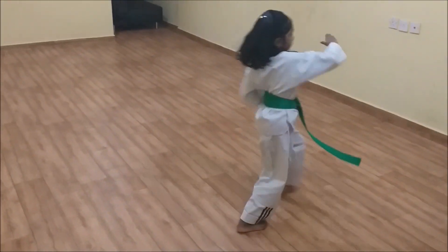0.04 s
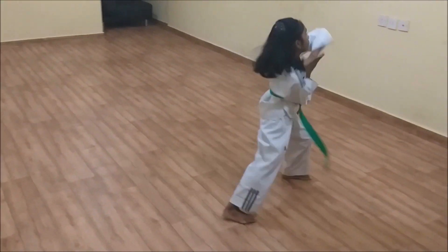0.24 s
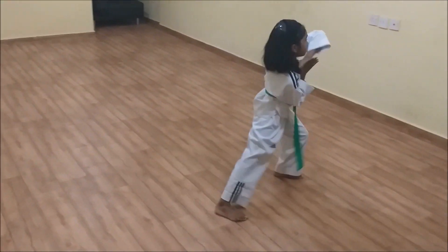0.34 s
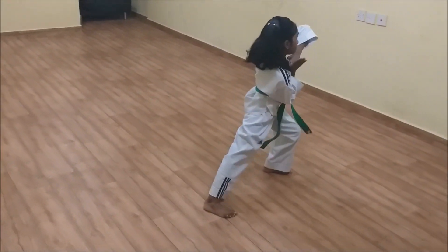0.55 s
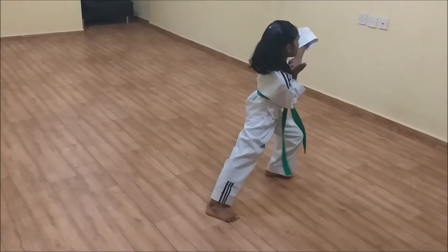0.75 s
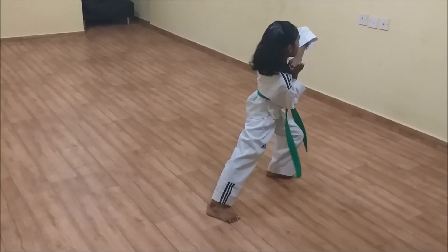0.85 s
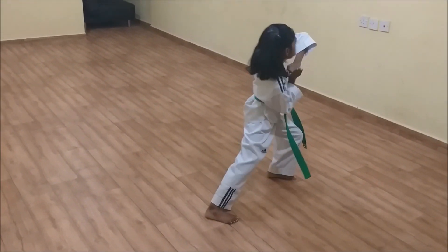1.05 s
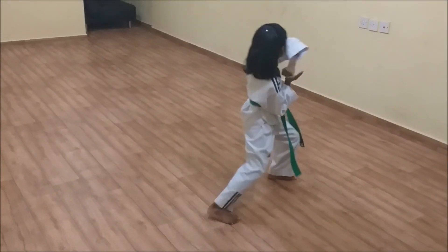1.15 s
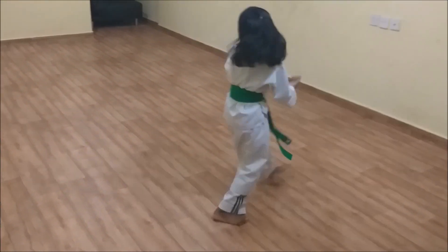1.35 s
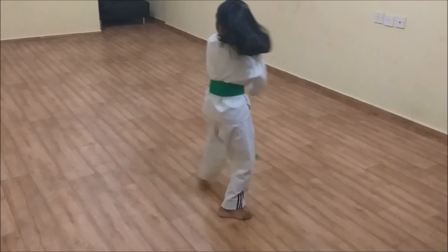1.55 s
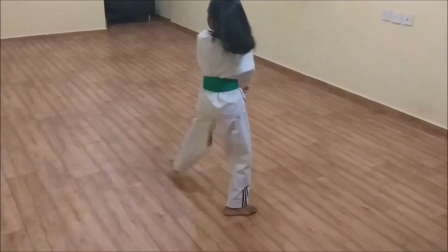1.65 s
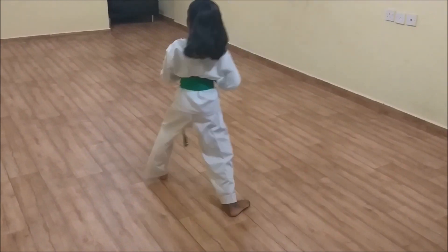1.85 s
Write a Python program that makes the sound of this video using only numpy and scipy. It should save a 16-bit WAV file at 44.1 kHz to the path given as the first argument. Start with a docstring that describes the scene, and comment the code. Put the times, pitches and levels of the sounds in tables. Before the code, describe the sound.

A stiff cotton uniform snaps sharply as a child strikes, ringing briefly around a bare room. After a lull, the cloth swishes through a turn, with faint barefoot scuffs and soft floor thuds over a low room rumble.

```python
"""A sharp cloth snap rings round a bare, hard-walled room: a child practises strikes in a stiff cotton
uniform. Pulled taut, the cloth gives a quick cluster of cracks; the loose sleeve puffs, crackles and flaps.
Runs of tiny slips make the rustle of the turning child and the brush of bare feet, and weight shifts thud
through the floor. Under it lie a low room rumble, a faint whirr and hiss."""
import sys
import numpy as np
from scipy import signal
from scipy.fft import rfft, irfft, next_fast_len
from scipy.io import wavfile

SR = 44100
rng = np.random.default_rng(int(sys.argv[2]) if len(sys.argv) > 2 else 0)


def dump(signal):
    """Clip the signal to [-1, 1] and save it as 16-bit WAV at the path in sys.argv[1]."""
    limited = np.clip(np.atleast_2d(signal).T, -1, 1)
    pcm = np.round(limited * 32767).astype(np.int16)
    wavfile.write(sys.argv[1], SR, pcm)


N = 83790
T = np.arange(N) / SR


def from_db(db):
    """Decibels to gain."""
    return 10 ** (np.asarray(db) / 20)


def rms_one(x):
    """Scale to unit rms."""
    return x / np.sqrt(np.mean(x ** 2) + 1e-20)


def at_hz(points, hz):
    """Read a table on a log-frequency axis."""
    knots_hz, values = np.transpose(points)
    return np.interp(np.log(np.maximum(hz, 1)), np.log(knots_hz), values)


def colour(x, spectrum, tilt_db_per_oct=0):
    """Minimum-phase filter with the given spectrum, tilted between 200 and 7500 Hz."""
    size = 2 * next_fast_len(N)
    hz = np.arange(size // 2 + 1) * SR / size
    octaves = np.log2(np.clip(hz, 200, 7500) / 5000)
    gain = from_db(at_hz(spectrum, hz) + tilt_db_per_oct * octaves)
    cepstrum = irfft(np.log(gain))
    cepstrum[1:size // 2] *= 2  # fold onto positive time: causal
    cepstrum[size // 2 + 1:] = 0
    return irfft(rfft(x, size) * np.exp(rfft(cepstrum)))[:N]


def coloured_noise(spectrum):
    """Unit-rms noise with the given spectral shape."""
    return rms_one(colour(rng.standard_normal(N), spectrum))


def resonance(hz, width_hz):
    """Denominator of a two-pole resonator."""
    radius = np.exp(-np.pi * width_hz / SR)
    return [1, -2 * radius * np.cos(2 * np.pi * hz / SR), radius * radius]


def ringing_noise(hz, width_hz):
    """Unit-rms noise, twice through one resonance, already settled."""
    section = [1, 0, -1] + resonance(hz, width_hz)
    return rms_one(signal.sosfilt([section, section], rng.standard_normal(2 * N))[N:])


def stroke(start_s, swell_s, fade_s):
    """Envelope of one movement: linear swell, exponential fade."""
    swell = np.clip((T - start_s) / swell_s, 0, 1)
    return swell * np.exp(-np.maximum(T - start_s - swell_s, 0) / fade_s)


def friction(strokes, spectrum, slips_per_s=5000, spread_db=4.5):
    """Each stroke is a dense run of tiny slips of uneven size."""
    out = 0
    for start_s, swell_s, fade_s, db, tilt_db_per_oct in strokes:
        sizes = from_db(spread_db * np.minimum(rng.exponential(1, N), 4))
        signs = rng.choice([-1, 1], N)
        slips = sizes * signs * (rng.random(N) < slips_per_s / SR)
        rub = rms_one(colour(slips, spectrum, tilt_db_per_oct))
        out = out + from_db(db) * stroke(start_s, swell_s, fade_s) * rub
    return out


def in_room(x, repeats, tail_db, build_s=0.016, scatter_db=1.5):
    """Direct sound, delayed repeats and the diffuse tail of hard walls, drawn anew for each call."""
    # Reverberation. Each row: frequency in Hz, T60 in seconds.
    room_t60 = [(200, 0.71), (1000, 0.42), (3000, 0.61), (5500, 0.54), (8000, 0.44), (11000, 0.33),
                (16000, .32)]
    noise = rng.standard_normal(N)
    roughness = from_db(scatter_db * np.repeat(rng.standard_normal(N), 40)[:N])
    scatter = rfft(noise * roughness, 2 * N)
    hz = np.arange(N + 1) / 2 * SR / N
    centres_hz = np.geomspace(200, 16000, 14)
    tail = 0
    for centre_hz, weights in zip(centres_hz, np.eye(len(centres_hz))):
        band = irfft(scatter * np.interp(hz, centres_hz, weights))[:N]
        tail = tail + band * np.exp(-np.log(1000) * T / at_hz(room_t60, centre_hz))
    tail = tail * (1 - np.exp(-T / build_s))
    response = from_db(tail_db) * tail / np.sqrt(np.sum(tail ** 2))
    response[0] += 1
    for delay_s, db in repeats:
        response[int(delay_s * SR)] += from_db(db)
    return signal.fftconvolve(x, response / np.sqrt(np.sum(response ** 2)))[:N]


def microphone_hiss():
    """Independent self-noise in each channel."""
    # Hiss spectrum. Each row: frequency in Hz, relative density in dB.
    hiss_spectrum = [(100, -24), (260, -6), (500, -7), (900, -5.5), (3000, -9), (6000, -7.5), (10000, -3.5),
                     (16000, -12)]
    return from_db(-79) * np.array([coloured_noise(hiss_spectrum) for _ in range(2)])


def background():
    """Steady ringing rumble under broad air noise and a faint whirr; those two dip briefly."""
    # Air noise spectrum. Each row: frequency in Hz, relative density in dB.
    air_spectrum = [(20, -36.5), (45, -2), (90, 1.5), (190, -1.5), (260, -11.5), (450, -20.5), (700, -17.5),
                    (1150, -19.5), (1450, -15), (1950, -14), (2400, -27.5), (3000, -26.5), (4200, -27),
                    (7500, -31), (9500, -57.5), (16000, -36)]
    # Ringing bands of the rumble. Each row: frequency in Hz, width in Hz, level in dB.
    hums = [(56.8, 8.6, -63), (103.5, 9, -61), (131, 18, -67), (179.4, 23, -68.5)]
    # Drift of air noise and whirr. Each row: time in seconds, gain in dB.
    air_level = [(0, -2), (.15, 0), (.45, -0.5), (.6, -3), (.8, 0.5), (1.15, -1), (1.45, -1.5), (1.9, 1.5)]
    air = from_db(-59.5) * coloured_noise(air_spectrum)
    rumble = sum(from_db(db) * ringing_noise(hz, width_hz) for hz, width_hz, db in hums)
    whirr = from_db(-69.5) * ringing_noise(hz=1436, width_hz=170)
    drift = from_db(np.interp(T, *np.transpose(air_level)))
    return rumble + drift * (air + whirr)


def floor_thuds():
    """Weight shifts and the strike each stir one low resonance of floor or room."""
    # Each row: start, swell and fade in seconds, level in dB, resonance in Hz.
    thuds = [(.03, .04, 0.12, -54, 99), (.23, 0.07, 0.12, -55, 187), (1.0, 0.062, 0.09, -52, 111),
             (1.225, 0.044, 0.031, -50, 127), (1.44, 0.025, 0.11, -55, 102)]
    return sum(from_db(db) * stroke(start_s, swell_s, fade_s) * ringing_noise(hz, width_hz=25.5)
               for start_s, swell_s, fade_s, db, hz in thuds)


def feet():
    """Bare soles brush the floor; one foot pivots and rubs with a narrow ring."""
    # Sole strokes. Each row: start, swell and fade in seconds, level in dB, tilt in dB per octave.
    scuffs = [(-.02, 0.023, 0.013, -50, -4.5), (1.322, 0.01, 0.042, -64.5, -0.5),
              (1.785, 0.0043, 0.027, -47, 3)]
    # Sole spectrum. Each row: frequency in Hz, relative level in dB.
    sole_spectrum = [(200, -0.5), (500, -7), (900, -5.5), (1400, 3.5), (2200, -2), (3800, -4),
                     (6000, -16.5), (10000, -33.5), (16000, -42.5)]
    pivot = ringing_noise(hz=1460, width_hz=300) * stroke(start_s=1.718, swell_s=0.032, fade_s=0.028)
    return friction(scuffs, sole_spectrum) + from_db(-52.5) * pivot


def cloth_rustle():
    """Stiff cotton rubs and swishes as the child turns."""
    # Cloth strokes. Each row: start, swell and fade in seconds, level in dB, tilt in dB per octave.
    rustles = [(-.03, 0.034, 0.033, -57.5, -1), (.158, 0.021, .03, -53.5, 4),
               (.717, 0.0055, .035, -57, -1.5), (.965, .015, 0.34, -75, 4), (1.29, 0.043, 0.048, -61, -5),
               (1.478, 0.038, 0.03, -40.5, -1), (1.712, 0.0041, 0.14, -53.5, 2)]
    # Cloth spectrum. Each row: frequency in Hz, relative level in dB.
    cloth_spectrum = [(300, -23), (1000, -33.5), (2000, -21), (2800, -19.5), (4000, -7), (5400, -0.5),
                      (6600, -5), (7500, -1.5), (8700, -13.5), (9800, -32.5), (12000, -30), (16000, -30)]
    return friction(rustles, cloth_spectrum)


def sleeve():
    """The arm pushes a puff of air; the loose sleeve crackles as it pulls straight, then flaps dully."""
    # Crease bursts. Each row: start, swell and fade in seconds, level in dB, tilt in dB per octave.
    crackles = [(.212, 0.0067, .011, -36, 2), (1.5, 0.02, 0.012, -55, 19)]
    # Crease and flap spectra. Each row: frequency in Hz, relative level in dB.
    crackle_spectrum = [(200, -2.5), (900, -7.5), (1500, 8), (2700, 1.5), (4000, 7), (5500, -8),
                        (7800, -0.5), (10000, -8.5), (11500, -3), (16000, -9)]
    flap_spectrum = [(100, -10.5), (200, -0.5), (400, 5), (620, 17), (1100, 15), (2500, 10.5),
                     (6000, -35.5)]
    puff = ringing_noise(hz=245, width_hz=200) * stroke(start_s=0.168, swell_s=0.043, fade_s=0.0342)
    flap = coloured_noise(flap_spectrum) * stroke(start_s=0.2223, swell_s=0.021, fade_s=0.049)
    return from_db(-55.5) * puff + friction(crackles, crackle_spectrum) + from_db(-48) * flap


def crack_pulse(start_s=0.2124, gain_db=1.0):
    """Cloth pulls taut: the pulse that repeats in the snap, spread over a few cycles by stiffness."""
    # Crack spectrum. Each row: frequency in Hz, relative level in dB.
    crack_spectrum = [(200, -45.5), (900, -45), (1500, -36), (2700, -32.5), (4100, -15), (5450, -2.5),
                      (6400, -6), (7250, -16.5), (7800, -16.5), (8800, -24.5), (9800, -45), (11500, -49.5),
                      (16000, -51)]
    click = np.zeros(N)
    click[int(start_s * SR)] = 1
    pulse = colour(click, crack_spectrum)
    pulse /= np.abs(pulse).max()
    poles = resonance(hz=5835, width_hz=1000)
    return from_db(gain_db) * signal.lfilter(poles[::-1], poles, pulse)  # all-pass


def scene():
    """Snap, cloth and feet sound in the room; the channels differ by their own hiss, by a second room signal
    mixed into the side, and by a lean to the left near 2 kHz."""
    # A quick cluster of cloth cracks within 9 ms, then wall echoes. Each row: delay in seconds, gain in dB.
    repeats = [(.0012, -7), (.0026, 1.5), (.0041, 0), (.0084, 1.5), (.0133, -7), (0.0255, -7.5),
               (0.026, -11), (0.0295, -6), (0.035, -8), (0.044, -4.5), (.0455, -5.5), (.0900, -9)]
    # Stereo width. Each row: frequency in Hz, gain of a second room signal into the side in dB.
    width = [(200, -50), (500, -45), (1000, -37), (1350, -24), (2100, -9.5), (2700, -45), (5500, -45),
             (9000, -35.5), (14000, -32.5)]
    # Lean to the left. Each row: frequency in Hz, gain of the mid into the side in dB.
    lean = [(900, -51), (1400, -26.5), (1900, -5.5), (2800, -49)]
    crack = crack_pulse()
    body = [sleeve() + feet(), cloth_rustle()]
    mid = in_room(crack, repeats, tail_db=10)
    mid += sum(in_room(x, repeats=[], tail_db=1.5) for x in body)  # spread out: no distinct echoes
    mid += background()
    second_room = in_room(crack + sum(body), repeats, tail_db=10) + background()
    lean_gain = from_db(at_hz(lean, np.arange(N // 2 + 1) * SR / N))
    side = colour(second_room, width) + irfft(rfft(mid) * lean_gain, N)
    return np.array([mid + side, mid - side]) + microphone_hiss() + floor_thuds()


def record(dry, cutoff_hz=16000):
    """Steep elliptic low-pass."""
    return signal.sosfilt(signal.ellip(10, .2, 70, cutoff_hz, fs=SR, output="sos"), dry)


dry = scene()
out = record(dry)
dump(out)
```